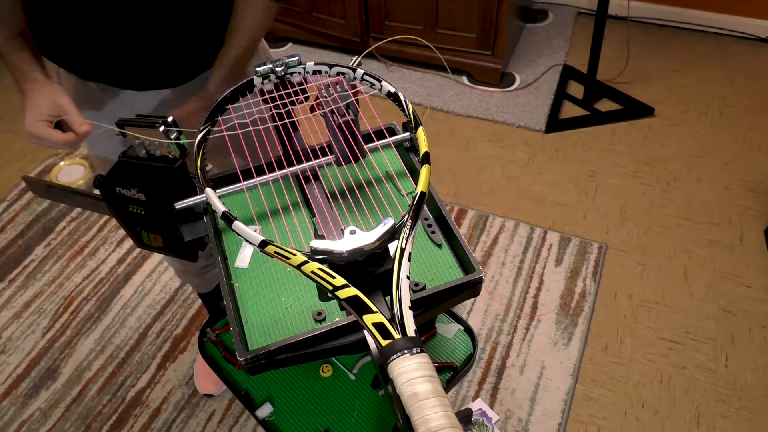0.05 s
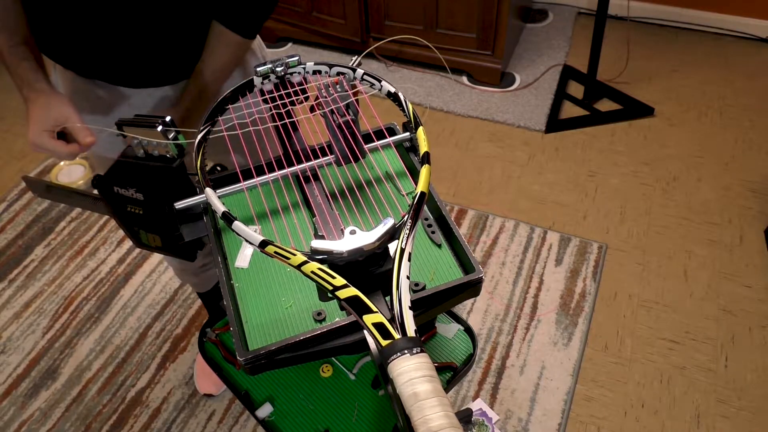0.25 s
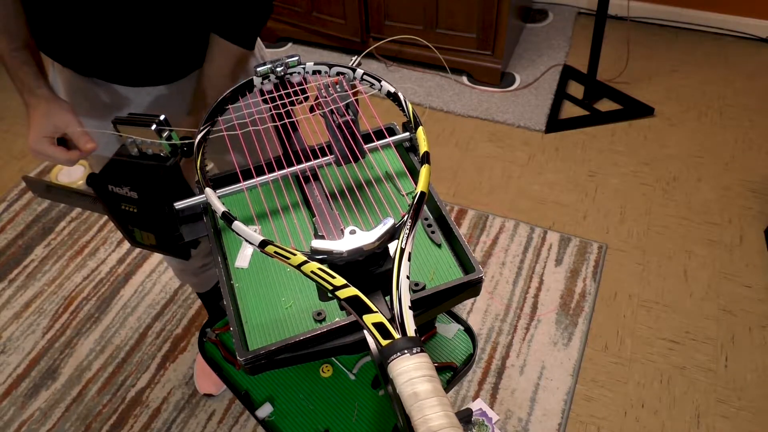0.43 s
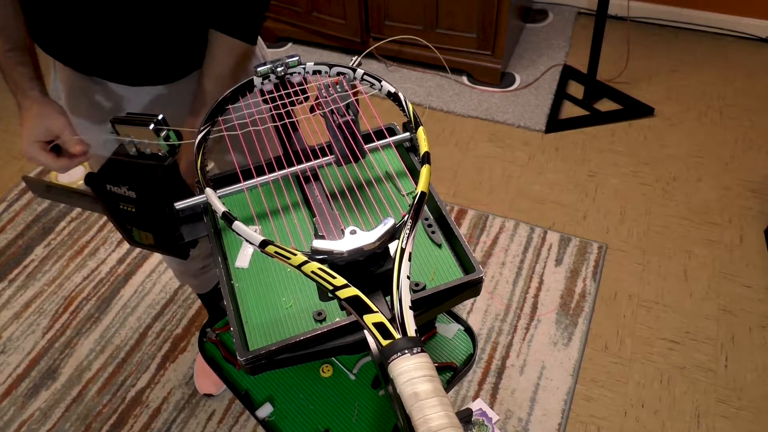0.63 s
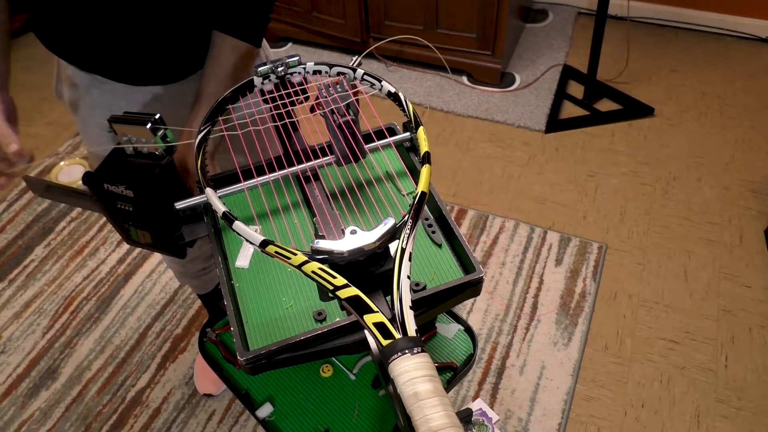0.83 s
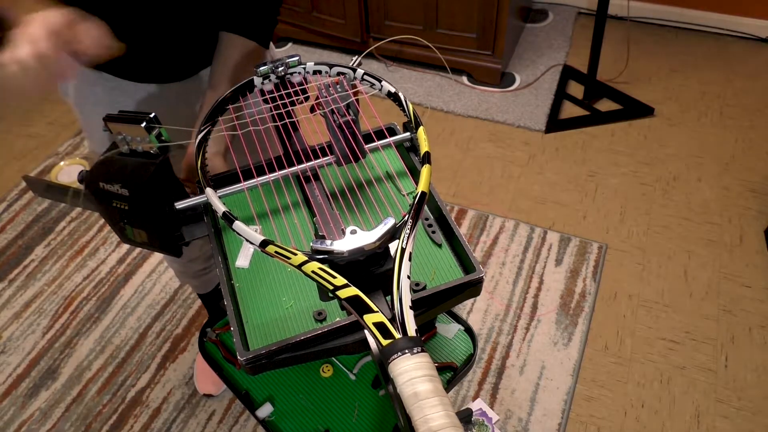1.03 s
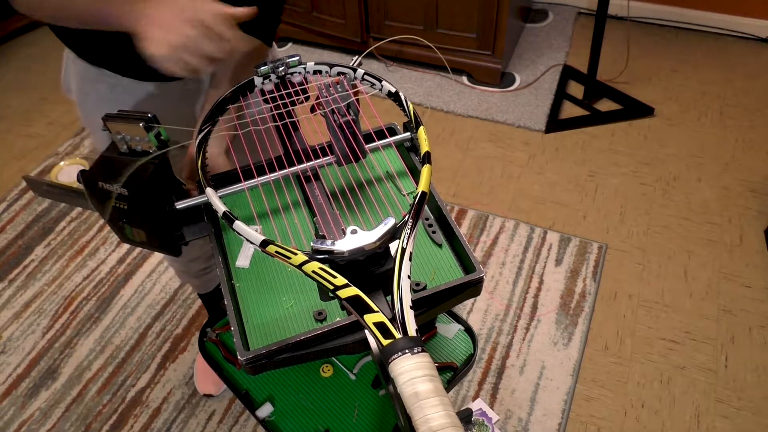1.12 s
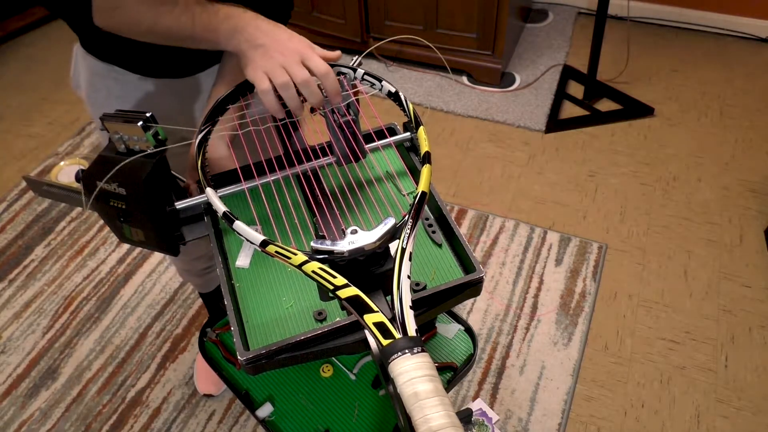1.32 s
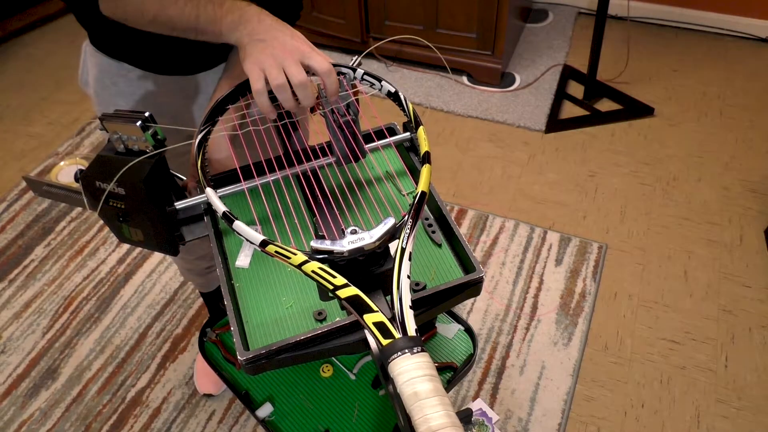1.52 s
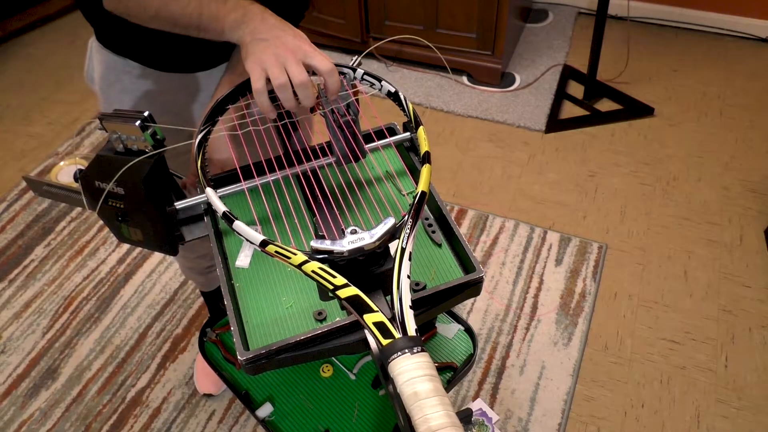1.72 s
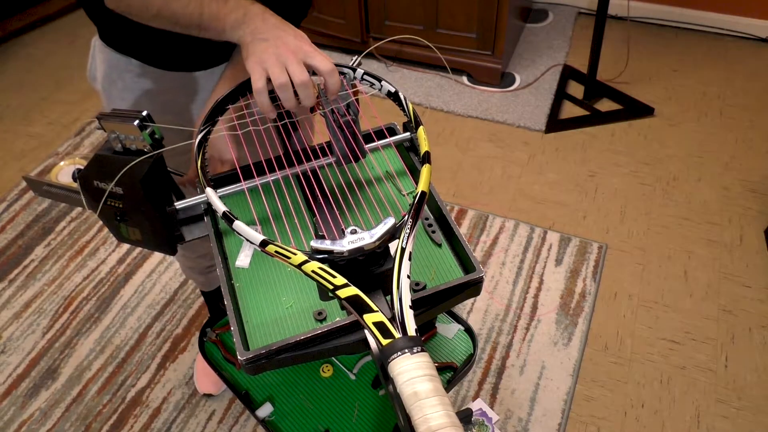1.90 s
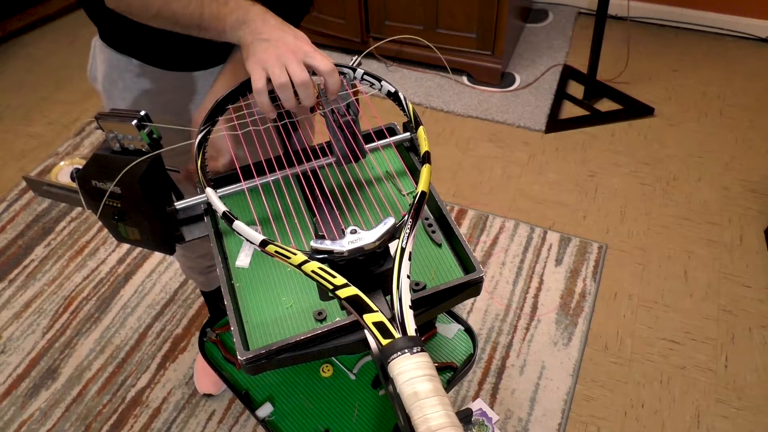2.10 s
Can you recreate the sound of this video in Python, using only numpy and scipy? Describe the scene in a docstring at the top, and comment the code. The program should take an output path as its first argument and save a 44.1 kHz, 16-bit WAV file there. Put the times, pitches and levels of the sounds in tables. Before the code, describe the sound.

A metal clamp on a racket stringing machine snaps over and clacks. String then slides with a thin hiss and sharp ticks, a sleeve rustles, and a hand lightly taps the racket frame, close by in a small quiet room.

```python
"""A racket stringing machine is worked in a small quiet room.
A metal part pings, a clamp lever snaps over and the clamp clacks against the machine's body.
A second loose part tinks, the string slides with a thin hiss and sharp ticks, and a sleeve brushes past.
Last, a hand taps the racket's frame, which sets the strings ringing, and draws the string on.
Each knock is a crack of noise plus fading tones; each rub is a grainy hiss."""
import sys
import numpy as np
from scipy import signal
from scipy.fft import rfft, irfft
from scipy.io import wavfile
from scipy.ndimage import uniform_filter1d

SR = 44100
rng = np.random.default_rng(int(sys.argv[2]) if len(sys.argv) > 2 else 0)


def digitize_waveform(pressure):
    """Quantize a signal to 16-bit integers and store it at the path in sys.argv[1].

    Rows of a 2-D input are taken as channels; values are limited to [-1, 1].
    """
    field = np.atleast_2d(pressure).T
    bounded = np.clip(field, -1, 1)
    quanta = np.round(bounded * 32767).astype(np.int16)
    wavfile.write(sys.argv[1], SR, quanta)


N = 94815
TIME = np.arange(N) / SR
CUTOFF_HZ = 15850
# the crack of both loose metal parts: (pitch [Hz], level [dB])
METAL_CRACK = [(200, -26), (700, -6), (1700, 10), (5000, 2), (7000, -3.5), (15000, -29)]


def from_db(db):
    """Turn decibels into a gain. Table levels are relative; a fade time (t60) is a fall of 60 dB."""
    return 10 ** (np.asarray(db) / 20)


def at_hz(points, hz, column=1):
    """Read between a table's rows, with octaves evenly spaced."""
    table = np.array(points)
    return np.interp(np.log(hz + 1), np.log(table[:, 0]), table[:, column])


def noise(colour, size, peaks=()):
    """Noise of strength 1; colour sets its balance of low and high, peaks lift single pitches."""
    hz = np.fft.rfftfreq(size, 1 / SR)
    lift_db = sum(boost / (1 + (2 * (hz - centre) / width) ** 2) for centre, width, boost in peaks)
    gain = from_db(at_hz(colour, hz) + lift_db)
    return irfft(rfft(rng.standard_normal(size)) * gain, size) / np.sqrt(np.mean(gain ** 2))


def narrow_noise(centre, width):
    """Noise of strength 1 around one pitch."""
    hz = np.fft.rfftfreq(N, 1 / SR)
    band = irfft(rfft(rng.standard_normal(N)) / (1 + (2 * (hz - centre) / width) ** 2), N)
    return band / band.std()


def sliding(swell, colour, peaks, rough_db, grains_hz):
    """Rubbing makes a hiss whose level flutters, so it sounds grainy."""
    grain = np.interp(TIME * grains_hz, np.arange(SR), rng.standard_normal(SR))
    level_db = np.interp(TIME, *np.transpose(swell)) + rough_db * grain
    return noise(colour, N, peaks) * from_db(level_db)


def struck(hits, tones, crack, crack_db, crack_t60, ring_db, attack_s):
    """Each hit cracks and sets the part ringing. Gives two rows: direct sound, spill into the room."""
    spread_db = 2.5  # each hit rings the tones a little differently
    ring_spill_db = -6  # the room takes up less of the ring than of the crack
    out, t = np.zeros((2, N + SR)), TIME[:SR // 2]
    rings = np.array([from_db(db + ring_db - 60 * t / t60) * np.sin(2 * np.pi * hz * t)
                      for hz, db, t60 in tones])
    rise = 1 - np.exp(-t / attack_s)
    for time_s, db, bright_hz in hits:
        ring = from_db(spread_db * rng.standard_normal(len(tones))) @ rings
        snap = noise(crack, len(t)) * from_db(crack_db - 60 * t / crack_t60)
        blow = snap + np.array([ring, from_db(ring_spill_db) * ring])
        soften = signal.butter(2, min(bright_hz, CUTOFF_HZ), fs=SR, output="sos")
        start = int(time_s * SR)
        out[:, start:start + len(t)] += from_db(db) * signal.sosfilt(soften, blow * rise)
    return out[:, :N]


def evened(tail, width_hz=15):
    """Level out chance peaks, so that the room favours no single pitch."""
    spectrum = rfft(tail)
    power = abs(spectrum) ** 2 + 1e-12
    near, wide = uniform_filter1d(power, size=width_hz), uniform_filter1d(power, size=10 * width_hz)
    return irfft(spectrum * np.sqrt(wide / near), SR)[:SR // 2]


def room_echo(sound, build_s=0.0094):
    """Echoes blur into a tail that builds quickly; each octave fades at its own pace."""
    # the room's tail: (pitch [Hz], level [dB], fade time [s])
    fades = [(60, -3, 0.46), (240, -9.5, 0.58), (487, -4, 0.61), (990, -3.5, 0.47), (2000, -4, 0.41),
             (4100, -8, 0.43), (8200, -5.5, 0.31), (15000, -12, 0.21)]
    t, hz = TIME[:SR], np.fft.rfftfreq(SR, 1 / SR)
    white, tail = rfft(rng.standard_normal(SR)), 0
    for centre in 31.25 * 2 ** np.arange(10):
        octave = np.clip(1 - abs(np.log2((hz + 1) / centre)), 0, 1)
        band = irfft(white * octave, SR)
        t60 = at_hz(fades, centre, column=2)
        envelope = from_db(-60 * t / t60) * (1 - np.exp(-t / build_s))
        tail = tail + band * envelope / np.linalg.norm(envelope) * from_db(at_hz(fades, centre))
    return signal.fftconvolve(sound, evened(tail))[:N]


def room_tone():
    """The room has a steady hiss and a wavering low drone."""
    # the hiss: (pitch [Hz], level [dB])
    air = [(35, 1), (60, 1), (486, -5.5), (953, -10), (1120, -7), (1290, -8), (2010, -11.5), (2250, -12),
           (2780, -16), (4740, -13.5), (5980, -17), (6560, -15.5), (15500, -19)]
    # the drone: (pitch [Hz], width [Hz], level [dB])
    hum = [(177, 30, -70), (248.8, 7.2, -75)]
    hiss = from_db(-60.5) * noise(air, N)
    return hiss + sum(from_db(db) * narrow_noise(hz, width) for hz, width, db in hum)


def handling_bumps(width_hz=45):
    """Soft bumps of handling swell and fade without a click."""
    # the bumps: (time [s], level [dB], pitch [Hz], half-length [s])
    bumps = [(1.125, -58, 272, 0.017), (1.72, -65, 1321, 0.024), (1.926, -60.5, 149, 0.042)]
    return sum(from_db(db) * narrow_noise(hz, width_hz) * np.exp(-((TIME - time_s) / half_s) ** 2)
               for time_s, db, hz, half_s in bumps)


def finger_rub():
    """The string rubs as it is drawn through the fingers."""
    # the rub's loudness: (time [s], level [dB])
    swell = [(1.6, -98), (1.72, -65), (1.9, -61.5), (2.15, -61)]
    # its colour: (pitch [Hz], level [dB])
    colour = [(150, 3), (600, 4.5), (2600, -8), (7000, -8), (15000, -20)]
    # its peaks: (pitch [Hz], width [Hz], boost [dB])
    peaks = [(3230, 160, 12), (5020, 180, 13.5), (7200, 280, 7.5), (8300, 220, 11.5), (8860, 200, 12)]
    return sliding(swell, colour, peaks, rough_db=2.5, grains_hz=58.25)


def string_slide():
    """The sliding string makes a thin, whistling hiss."""
    # the slide's loudness: (time [s], level [dB])
    swell = [(.2, -88), (.5, -79), (.61, -63), (.69, -56.5), (.81, -68.5), (.93, -56.5), (1.06, -65.5),
             (1.22, -63), (1.36, -79), (1.65, -84)]
    # its colour: (pitch [Hz], level [dB])
    colour = [(1000, -2), (4000, -1), (8000, -2), (15000, -10)]
    # its whistles: (pitch [Hz], width [Hz], boost [dB])
    peaks = [(7280, 270, 16), (8460, 250, 17), (8820, 320, 14), (10530, 350, 16), (12500, 590, 9)]
    return sliding(swell, colour, peaks, rough_db=1.4, grains_hz=209)


def sleeve_brush():
    """Cloth rustles as a sleeve brushes past."""
    # the rustle's loudness: (time [s], level [dB])
    swell = [(.2, -92), (.5, -68.5), (.66, -55.5), (.82, -63), (.9, -53.5), (.97, -50), (1.05, -56.5),
             (1.15, -57), (1.27, -64.5), (1.38, -67.5), (1.64, -74.5), (2.15, -75)]
    # its colour: (pitch [Hz], level [dB])
    colour = [(150, -11.5), (600, 3.5), (1200, -3.5), (2600, -4), (5000, -5), (7000, -10.5), (9000, -9.5),
              (11500, -21), (15500, -31)]
    # its peaks: (pitch [Hz], width [Hz], boost [dB])
    peaks = [(1200, 70, 13), (2002, 100, 11), (3017, 80, 13.5), (5550, 360, 6.5), (8300, 140, 8)]
    return sliding(swell, colour, peaks, rough_db=2.0, grains_hz=141)


def strings_ring(start_s=1.303, level_db=-47.5, pitch_hz=546, t60=0.34):
    """The first tap on the frame sets the tight strings ringing briefly on one note."""
    t = np.maximum(TIME - start_s, 0)
    return from_db(level_db - 60 * t / t60) * np.sin(2 * np.pi * pitch_hz * t)


def frame_taps():
    """A hand taps the strung frame, which rings faintly."""
    # the taps: (time [s], level [dB], brightness [Hz])
    hits = [(1.2932, -3, 9100), (1.2963, -2.5, 8150), (1.3059, -1.5, 1800), (1.402, -9, 5000),
            (1.4125, -4.5, 5100), (1.505, -11.5, 7500)]
    # the frame's ring: (pitch [Hz], level [dB], fade time [s])
    tones = [(780, -52.5, .17), (1050, -52, 0.14), (1110, -50.5, 0.061), (1208, -49.5, 0.075),
             (1595, -53, 0.16), (1717, -57, 0.12), (2210, -49, 0.027), (4350, -44, 0.043),
             (4500, -47.5, 0.02), (6520, -44.5, 0.025)]
    # its crack: (pitch [Hz], level [dB])
    crack = [(90, 2.5), (330, -8.5), (1100, -1), (2200, -4.5), (2700, -6), (4600, -2), (5700, -8.5),
             (7200, -1.5), (10000, -11.5), (15000, -13)]
    return struck(hits, tones, crack, crack_db=-40, crack_t60=0.057, ring_db=0.5, attack_s=0.00085)


def string_ticks():
    """The string gives dry ticks that die almost at once."""
    # the ticks: (time [s], level [dB], brightness [Hz])
    hits = [(.3493, 1.5, 7500), (.6396, -11.5, 4930), (.6565, -10.5, 6860), (.695, -6.5, 4000),
            (.777, -12, 3520), (.859, -17, 3030), (.9616, 2.5, 15000), (1.048, -14, 7800),
            (1.1135, -10, 14100)]
    # their ring: (pitch [Hz], level [dB], fade time [s])
    tones = [(820, -55, 0.031), (1073, -44, 0.069), (1480, -46, 0.055), (4150, -41.5, 0.019),
             (5100, -51, 0.015), (6580, -32, 0.01)]
    # their crack: (pitch [Hz], level [dB])
    crack = [(200, -35), (800, 8), (2700, -5.5), (4200, 4.5), (7000, -1.5), (9500, -6), (15000, -9)]
    return struck(hits, tones, crack, crack_db=-33.5, crack_t60=0.029, ring_db=-3.5, attack_s=0.0001)


def metal_ping():
    """A small loose metal part touches lightly, then hits and rings."""
    # its hits: (time [s], level [dB], brightness [Hz])
    hits = [(.0455, -20, 4070), (.0665, 3, 9100)]
    # its ring: (pitch [Hz], level [dB], fade time [s])
    tones = [(1104, -51.5, 0.21), (1590, -55.5, 0.33), (2292, -39.5, 0.076), (3020, -46.5, 0.081),
             (4750, -52, 0.032)]
    return struck(hits, tones, METAL_CRACK, crack_db=-47.5, crack_t60=0.049, ring_db=-2.5, attack_s=0.00013)


def metal_tink():
    """A second loose part answers the clack with two clear notes at once."""
    # its hit: (time [s], level [dB], brightness [Hz])
    hits = [(.592, -2.5, 6900)]
    # its notes: (pitch [Hz], level [dB], fade time [s])
    tones = [(2223, -40, 0.088), (2930, -42, 0.076)]
    return struck(hits, tones, METAL_CRACK, crack_db=-54, crack_t60=0.03, ring_db=-0.5, attack_s=0.0002)


def lever_snap():
    """The clamp lever snaps over in a quick run of hits."""
    # its hits: (time [s], level [dB], brightness [Hz])
    hits = [(.2035, -12.5, 710), (.2096, -13.5, 5950), (.2134, -6, 4560), (.2173, -6, 930),
            (.2216, -1, 4130), (.2236, -0.5, 11900), (.2282, -3, 11200), (.3068, -7, 12800),
            (.3113, -7.5, 10000)]
    # its ring: (pitch [Hz], level [dB], fade time [s])
    tones = [(159, -40, 0.12), (272, -40, 0.085), (430, -33, 0.11), (633, -24, 0.05), (736, -35, 0.12),
             (1074, -29, 0.048), (1480, -38, 0.043), (2155, -35.5, 0.03), (2995, -35.5, 0.076),
             (5175, -30.5, 0.026), (7350, -38, 0.044), (9710, -31.5, 0.064), (11280, -44, .04),
             (12250, -43, .05)]
    # its short, dense crack: (pitch [Hz], level [dB])
    crack = [(50, -14), (90, -5.5), (300, -4), (700, 0), (1500, -1.5), (5000, -9.5), (6500, -16),
             (12000, -20), (14000, -30)]
    return struck(hits, tones, crack, crack_db=-22, crack_t60=0.048, ring_db=0.9, attack_s=0.00094)


def clamp_clack():
    """The clamp hits the machine's body several times, so fast that one clack is heard."""
    # its hits: (time [s], level [dB], brightness [Hz])
    hits = [(.3715, -5.5, 6000), (.3736, 1, 1260), (.3753, -4, 4100), (.3771, -0.5, 12900),
            (.3835, -6.5, 5130), (.3855, -4.5, 2000)]
    # the body's ring: (pitch [Hz], level [dB], fade time [s])
    tones = [(60.2, -43.5, 0.42), (146, -27.5, 0.1), (240, -34, 0.069), (368.5, -38, 0.42),
             (420, -27.5, 0.085), (490, -28, 0.027), (586, -37.5, 0.073), (666, -32.5, 0.034),
             (844, -30, 0.11), (948, -30, 0.11), (1060, -40, .06), (1203, -36, 0.098), (1570, -33, 0.088),
             (2168, -27, 0.062), (3220, -32, 0.035), (3441, -31.5, 0.06), (3494, -31, 0.08),
             (3760, -26.5, 0.053), (3970, -34, 0.075), (6070, -31, 0.026), (7370, -34, 0.048),
             (9500, -28, 0.026), (9470, -30, .03), (12165, -38, 0.079), (14870, -47, .05)]
    # its crack: (pitch [Hz], level [dB])
    crack = [(50, -31), (90, -21), (165, 4), (300, -3), (520, 2), (1300, -5), (2600, -13), (3700, -10.5),
             (5000, -12.5), (9000, -20.5), (14000, -28.5)]
    return struck(hits, tones, crack, crack_db=-19, crack_t60=0.052, ring_db=-1.45, attack_s=0.0008)


def scene():
    """The knocks echo in the room; quiet handling and the room's own tone lie under them."""
    lever, clamp = lever_snap(), clamp_clack()
    metal = metal_ping() + metal_tink()
    ticks, frame = string_ticks(), frame_taps()
    direct, _ = lever + clamp + metal + ticks + frame
    _, spill = (from_db(0.8) * lever + from_db(-1) * (clamp + frame)
                + from_db(-1.5) * metal + from_db(1.6) * ticks)
    handling = sleeve_brush() + string_slide() + finger_rub() + strings_ring() + handling_bumps()
    return (direct + room_echo(spill) + handling + room_tone())[None]


def record(dry):
    """The microphone drops the deep bass; the highest treble is cut steeply."""
    bass_cut = signal.butter(3, 48, "high", fs=SR, output="sos")  # below 48 Hz
    treble_cut = signal.ellip(12, .1, 80, CUTOFF_HZ, fs=SR, output="sos")
    return signal.sosfilt(treble_cut, signal.sosfilt(bass_cut, dry))


dry = scene()
out = record(dry)
digitize_waveform(out)
```